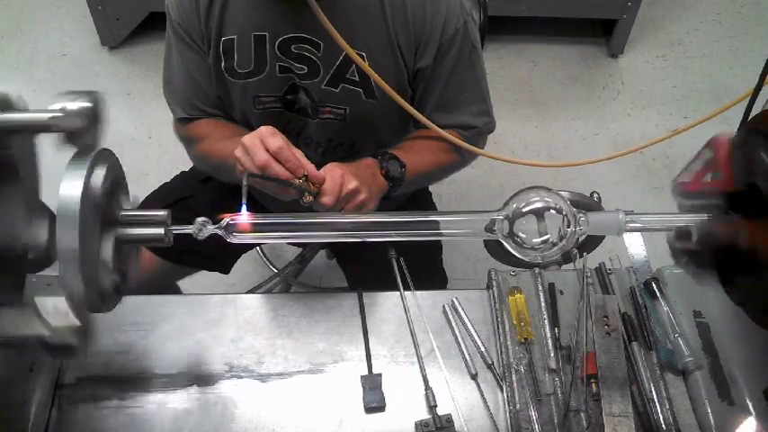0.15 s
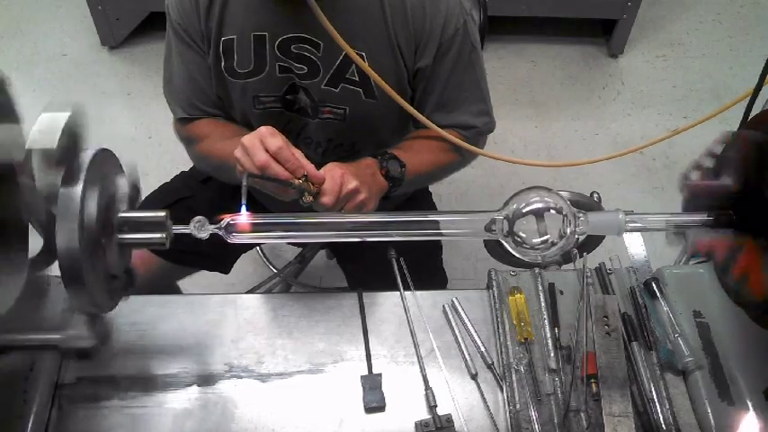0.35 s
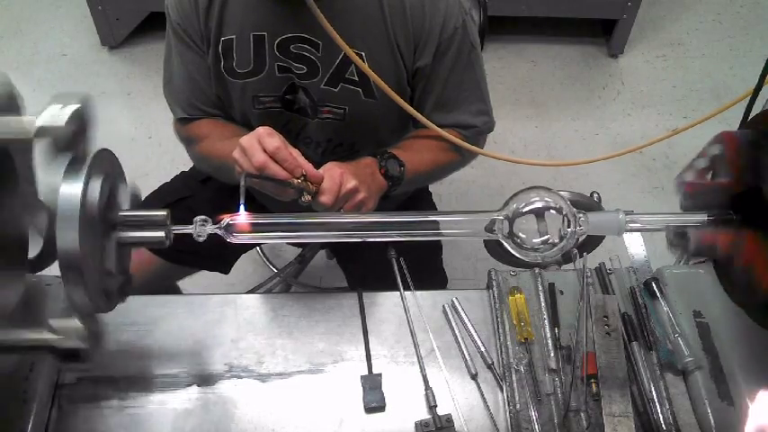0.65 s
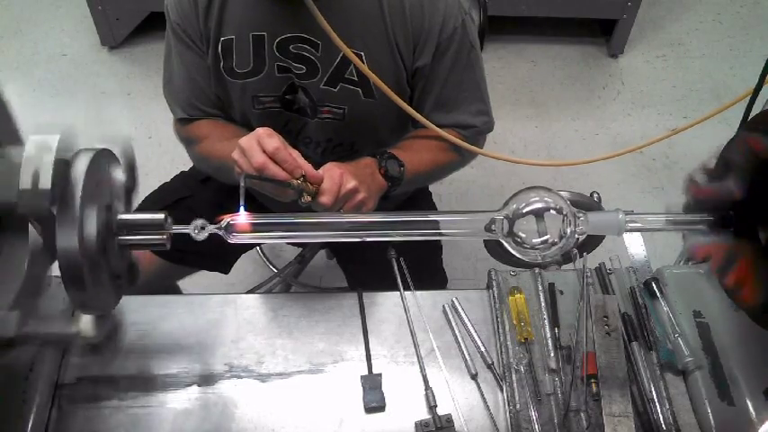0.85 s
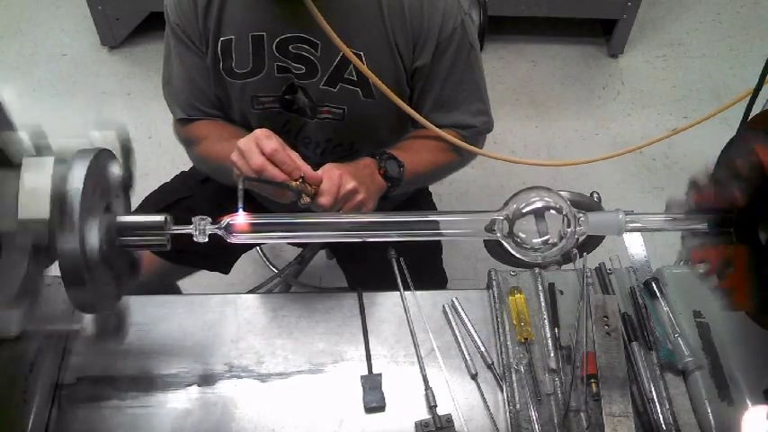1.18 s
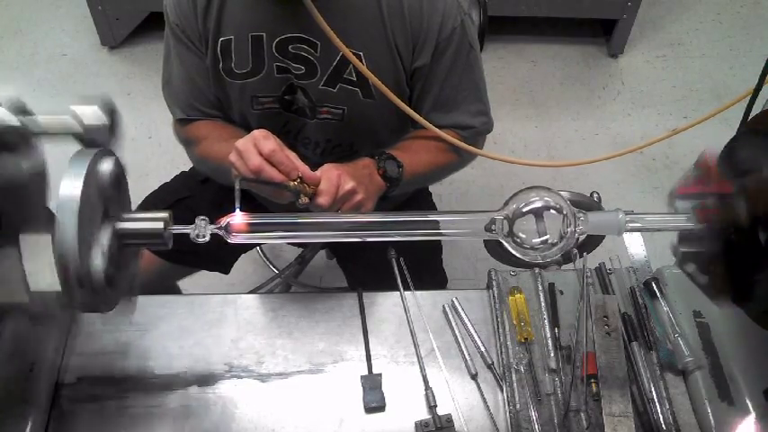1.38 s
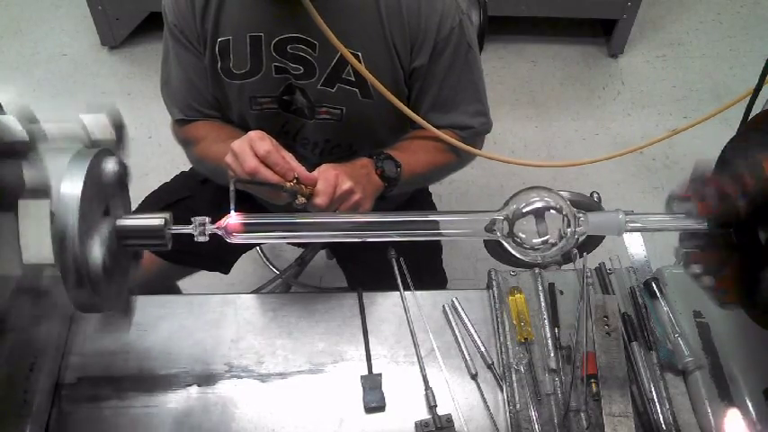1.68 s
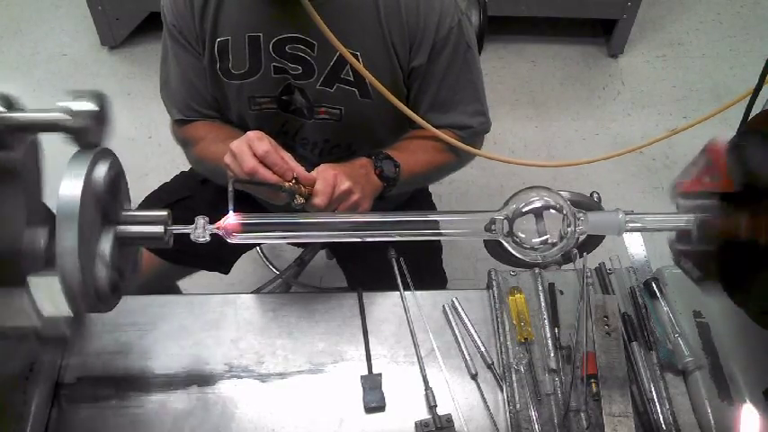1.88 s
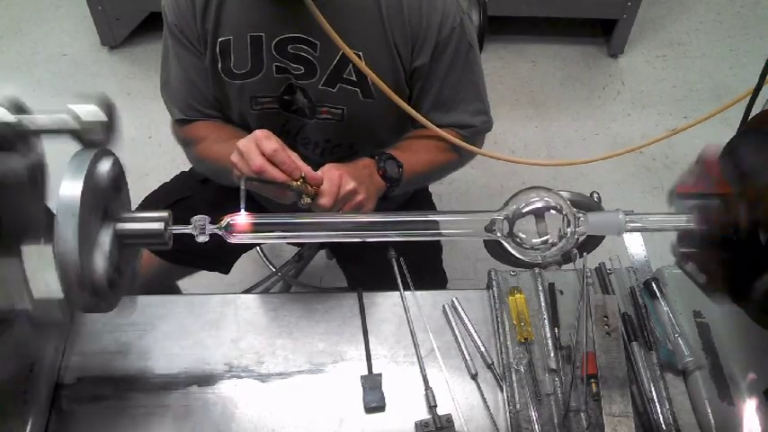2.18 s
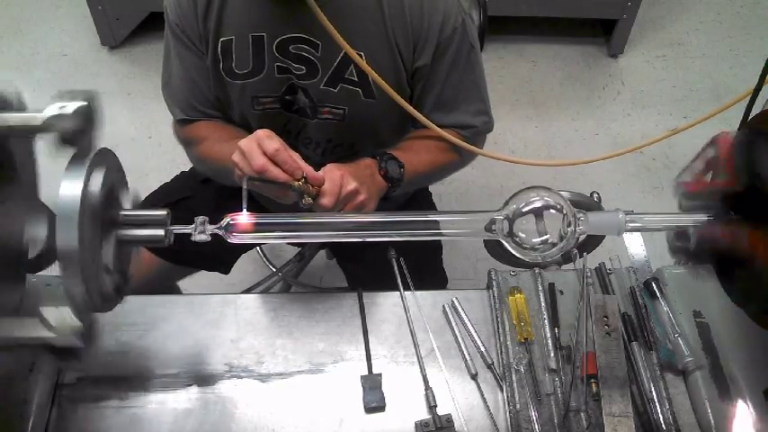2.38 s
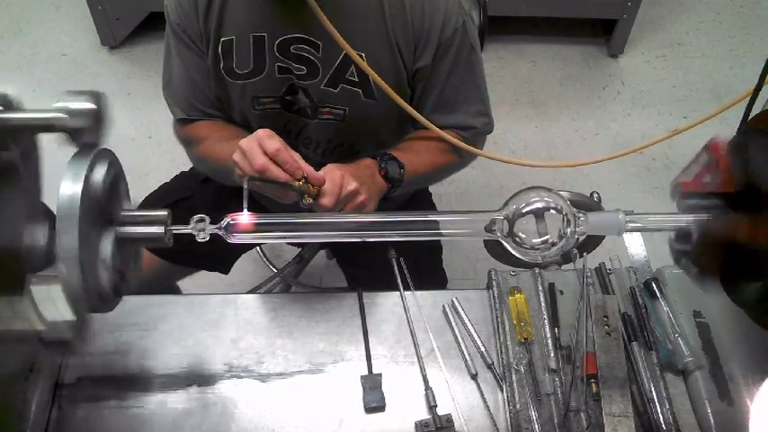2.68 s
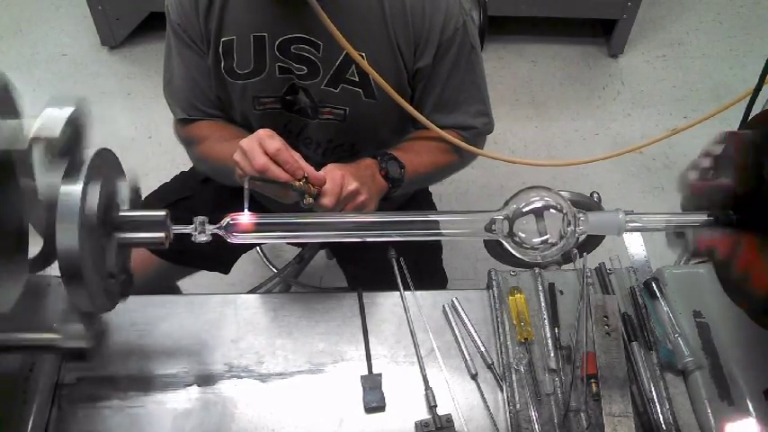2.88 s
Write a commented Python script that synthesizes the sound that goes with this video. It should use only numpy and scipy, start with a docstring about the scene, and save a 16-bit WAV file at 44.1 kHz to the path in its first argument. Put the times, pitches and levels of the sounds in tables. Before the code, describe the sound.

A small hand torch hisses steadily from 0 to about 3 seconds, bright, airy and wide in stereo, with fine rapid flicker, faint ringing bands and a breathy gas-jet top. It lifts very slightly near 1.9 seconds, and the jet again near 2.5. Beneath, a lathe drive rumbles continuously while two thin gear tones waver, stronger on the right. Close workshop pickup, very short bench echoes, dulled extreme top.

```python
"""Torch on a turning glass tube

In a workshop, a small hand torch hisses on a glass tube turning in a lathe, close to a microphone with
two ports. The flame is coloured noise that reaches the ports with a lag, so left and right swing in and
out of step as frequency rises. The gas jet adds a breathy top band from the other side. The lathe drive
rumbles in three noise bands and its gears hum in two unsteady tones; short bench echoes tint the torch.
"""
import sys
import numpy as np
from scipy import signal
from scipy.fft import rfft, irfft, next_fast_len
from scipy.io import wavfile
from scipy.ndimage import uniform_filter1d, map_coordinates

SR = 44100
rng = np.random.default_rng(int(sys.argv[2]) if len(sys.argv) > 2 else 0)


def materialize(psi):
    """Save the field psi as 16-bit PCM at rate SR to the path in sys.argv[1].

    A 1-D psi becomes a single channel; in a 2-D psi each row is a channel.
    """
    bounded = np.clip(np.atleast_2d(psi).T, -1, 1)
    quanta = np.round(bounded * 32767).astype(np.int16)
    wavfile.write(sys.argv[1], SR, quanta)


N = 134505


def amp(db):
    """Amplitude factor for a level in dB."""
    return 10 ** (np.asarray(db) / 20)


def unit(x):
    """x scaled to rms 1."""
    return x / np.sqrt(np.mean(x ** 2) + 1e-20)


def along(points, hz):
    """Level in dB at hz, from (pitch_hz, level_db) points on a log frequency axis."""
    point_hz, level_db = np.transpose(points)
    return np.interp(np.log(hz + 1), np.log(point_hz + 1), level_db)


def curve(rows):
    """One value per sample, in straight lines between (time_s, value) rows."""
    time_s, value = np.transpose(rows)
    return np.interp(np.arange(N) / SR, time_s, value)


def wobble(rate):
    """A smooth random curve with rate knots a second."""
    knots = rng.standard_normal(int(N * rate / SR) + 4)
    return map_coordinates(knots, [np.arange(N) * rate / SR])


def filtered(x, response):
    """x filtered by a complex response of frequency, padded so that the end does not wrap round."""
    size = next_fast_len(N + SR // 2)
    spectrum = rfft(x, size) * response(np.fft.rfftfreq(size, 1 / SR))
    return irfft(spectrum, size)[..., :N]


def rings(hz, bands):
    """Narrow resonant bumps or dips in dB, from (pitch_hz, width_hz, level_db) rows."""
    return sum(db / (1 + (2 * (hz - centre) / width) ** 2) for centre, width, db in bands)


def below(hz, edge):
    """Steep low-pass in dB, 3 dB down at the edge."""
    return -10 * np.log10(1 + (hz / edge) ** 12)


def above(hz, edge):
    """Steep high-pass in dB, about 3 dB down at the edge."""
    return -10 * np.log10(1 + (edge / (hz + 1)) ** 12)


def rush(colour_db, ports, patchy_db):
    """Patchy noise of rms 1 at two ports: two independent noises mixed by phase, likeness and lean."""
    grid = signal.stft(rng.standard_normal((2, N)), nperseg=512)[2]
    # patches smoothed over 6 frequency bins and 8 time frames, shared by both noises
    patches = uniform_filter1d(rng.standard_normal(grid.shape[1:]), size=6, axis=0)
    patches = uniform_filter1d(patches, size=8, axis=1)
    pair = signal.istft(grid * amp(patchy_db * unit(patches)), nperseg=512)[1][:, :N]
    port_hz, turns, alike, lean_db = np.transpose(ports)

    def heard(hz, side):
        # the angle between the two mixes sets how alike the ports sound
        angle = np.arccos(np.clip(np.interp(hz, port_hz, alike), 0, 1)) / 2
        gain = amp(colour_db(hz) + side * np.interp(hz, port_hz, lean_db) / 2)
        phase = np.exp(side * 1j * np.pi * np.interp(hz, port_hz, turns))
        return gain * phase * [np.cos(angle), side * np.sin(angle)]

    left = filtered(pair, lambda hz: heard(hz, 1)).sum(axis=0)
    right = filtered(pair, lambda hz: heard(hz, -1)).sum(axis=0)
    return unit(np.array([left, right]))


# flame loudness before FLAME_DB is added: time_s, level_db
FLAME_LEVEL = [(0.0, -34), (0.03, -31), (1.88, -32), (1.9, -29), (2.01, -33), (2.08, -31.5), (2.44, -33),
               (2.53, -31.5), (2.74, -33.5), (2.85, -32), (2.92, -34), (3.05, -32.5)]
# relative colour of the flame's hiss per Hz: pitch_hz, level_db
FLAME_COLOUR = [(1200, -30), (1900, -7.5), (2300, -1), (2700, -3), (3200, 1), (3800, -1), (4500, -1.5),
                (5000, 3), (5700, -3), (7000, -2), (8300, -2), (10000, -2.5), (11300, -3), (12000, -10.5),
                (13500, -15), (13700, -31)]
# narrow bands that the hiss rings in: pitch_hz, width_hz, level_db (over the hiss)
FLAME_RINGS = [(2140, 20, 4), (3520, 50, 5), (3824, 60, 5), (4096, 25, 4), (4214, 35, 7), (4420, 110, 6.5),
               (4490, 35, 9), (4765, 50, 4), (4900, 50, 3), (5400, 120, 3), (6450, 150, 2.5),
               (7500, 120, 2.5), (8700, 180, 3.5), (10800, 200, 2.5)]
# chosen stereo width of the hiss: pitch_hz, alike (left-right likeness 0-1), lean_db (left over right)
FLAME_WIDTH = [(1200, .85, 3), (1500, .8, 0), (1950, .3, -2), (2400, .8, 0), (2620, 1, 0), (3020, 1, 0),
               (3350, .5, -.5), (3650, .75, -.5), (3880, 1, 0), (4250, 1, 0), (4600, .9, -.5),
               (5050, .45, -.5), (5250, 1, 0), (5650, 1, 0), (6250, .4, -1), (6750, .82, -1),
               (7300, .8, -1), (7600, .4, -1), (8200, .85, -1), (8700, .6, -1), (9200, .7, -1),
               (9700, .3, -1.5), (10100, .5, -1.5), (10800, .2, -1.5), (12500, 0, -1.5)]
FLAME_DB = 4.5
FLAME_LAG_S, FLAME_START_TURNS = 0.000372, -0.525  # lead of the left port; phase offset between ports
FLAME_FLATTENING = 1  # 0-1: how far the left-right phase curve is flattened at each half turn


def flame():
    """Broad turbulent hiss with narrow ringing bands, a little earlier on the left; it flickers fast."""
    hz = np.arange(0, SR / 2, 20)
    lag = FLAME_START_TURNS + FLAME_LAG_S * hz
    turns = lag - FLAME_FLATTENING * np.sin(4 * np.pi * lag) / (4 * np.pi)
    width_hz, alike, lean_db = np.transpose(FLAME_WIDTH)
    ports = np.transpose([hz, turns, np.interp(hz, width_hz, alike), np.interp(hz, width_hz, lean_db)])
    flicker_db = 0.39 * wobble(17) + 0.43 * wobble(60) + 0.45 * wobble(250)
    hiss = rush(lambda hz: along(FLAME_COLOUR, hz) + rings(hz, FLAME_RINGS), ports, patchy_db=1.4)
    return amp(curve(FLAME_LEVEL) + FLAME_DB + flicker_db) * hiss


# jet loudness before JET_DB is added: time_s, level_db
JET_LEVEL = [(0.0, -31), (0.16, -36), (0.17, -32.5), (0.65, -32.5), (0.71, -31), (1.13, -32.5),
             (1.86, -33.5), (1.87, -30.5), (2.42, -32.5), (2.46, -28), (2.48, -30.5), (2.65, -31),
             (2.68, -34), (2.82, -30.5), (2.97, -33.5), (3.05, -33)]
# relative colour of the nozzle's breath per Hz: pitch_hz, level_db
JET_COLOUR = [(10500, -67), (11600, -1.5), (12400, -2), (12750, 6.5), (12950, 6), (13180, 6), (13400, 4),
              (13550, -3), (13700, -20)]
# the jet at the two ports: pitch_hz, lead_turns (of left), alike (likeness 0-1), lean_db (left over right)
JET_PORTS = [(11600, .25, .6, -3), (12400, .01, .85, -.5), (13000, -.21, .72, -.2), (13600, -.48, .6, -1)]
JET_DB = 1.6


def jet():
    """Gas rushing from the nozzle: a breathy top band of noise that flutters more than the flame."""
    flutter_db = 0.39 * wobble(22) + 1.3 * wobble(70)
    breath = rush(lambda hz: along(JET_COLOUR, hz), JET_PORTS, patchy_db=0)
    return amp(curve(JET_LEVEL) + JET_DB + flutter_db) * breath


BENCH_DB, BENCH_T60_S = -13, 0.1  # echo level against the direct sound; time to fall 60 dB


def bench(x):
    """Short decaying echoes, the same on both sides, draw a fixed fine ripple over the colour."""
    time_s = np.arange(SR // 5) / SR
    tail = rng.standard_normal(len(time_s)) * amp(-60 * time_s / BENCH_T60_S)
    tail = amp(BENCH_DB) * tail / np.linalg.norm(tail)
    echoes = signal.fftconvolve(x, tail[None], axes=1)[:, :N]
    return (x + echoes) / np.sqrt(1 + amp(2 * BENCH_DB))


# loudness of the lowest rumble: time_s, level_db
DEEP_LEVEL = [(0, -41.5), (1.3, -43), (2.3, -44.5), (3.05, -44)]
# loudness of the rumble's bass before BASS_DB is added: time_s, level_db
BASS_LEVEL = [(0, -42), (.8, -40), (1.3, -41.5), (1.5, -39.5), (1.8, -39), (2.45, -39), (2.65, -42),
              (3.05, -41)]
# loudness of the rumble's upper body before BODY_DB is added: time_s, level_db
BODY_LEVEL = [(0.0, -33.5), (0.1, -29.5), (0.11, -32), (0.23, -28), (0.25, -34.5), (0.3, -29.5),
              (0.35, -31.5), (1.84, -31), (1.95, -30), (2.03, -31.5), (2.94, -32.5), (3.05, -31.5)]
# relative colour of the drive's rumble per Hz: pitch_hz, level_db
DRIVE_COLOUR = [(30, -22), (45, -20), (62, -5), (75, -12), (92, -6), (120, -3.5), (150, -2), (190, 5),
                (210, 2), (235, 5.6), (270, -4), (310, -5.5), (345, -9), (410, 0.5), (540, -2), (680, -7.5),
                (800, -7), (900, -6), (1050, -10), (1200, -12.5), (1400, -12), (2000, -18), (2500, -84)]
# narrow bands in the rumble: the casing rings in or swallows most; the 384.5 and 479 Hz rows are faint gear
# sidebands either side of the 430 Hz hum: pitch_hz, width_hz, level_db (over the rumble)
DRIVE_RINGS = [(61.5, 6, 4), (91.5, 7, 4), (118, 8, -4), (157, 12, 5), (172, 10, -4), (190, 10, 2),
               (310, 12, -5), (323, 12, 4), (384.5, 14, 5), (407, 22, -6), (446, 10, 4), (458, 8, -5),
               (479, 14, 4), (513, 16, 3), (531, 12, -4), (705, 30, 3), (755, 14, 5), (810, 20, -4),
               (885, 30, 3), (925, 30, -4), (1140, 14, 4), (1355, 20, 5)]
# the drive at the two ports: pitch_hz, lead_turns (of left), alike (likeness 0-1), lean_db (left over right)
DRIVE_PORTS = [(30, 0.29, 0.13, 0.83), (62, -0.37, 0.93, 6.5), (92, -0.21, 0.77, 8.02),
               (120, -0.22, 0.71, 4.86), (150, -0.33, 0.59, -5.43), (190, -0.42, 0.78, -0.77),
               (235, -0.41, 0.76, -2.99), (270, -0.33, 0.61, -1.16), (310, -0.15, 0.66, -1.59),
               (410, -0.08, 0.32, -9.26), (540, 0.04, 0.26, -2.96), (680, 0.01, 0.68, -1.5),
               (900, -0.02, 0.79, -2.49), (1200, -0.01, 0.86, -0.48), (1400, -0.01, 0.91, -1.41),
               (2000, 0.27, 0.33, -2.17)]
DEEP_TOP_HZ, BASS_TOP_HZ = 125, 320  # where the three bands meet
BASS_DB, BODY_DB = 7.5, 2.5


def drive():
    """Lathe drive rumble: noise through the casing's resonances and faint gear sidebands, in three bands that
    swell on their own."""
    def colour(hz):
        return along(DRIVE_COLOUR, hz) + rings(hz, DRIVE_RINGS)

    def bass_colour(hz):
        return colour(hz) + above(hz, DEEP_TOP_HZ) + below(hz, BASS_TOP_HZ)

    deep = rush(lambda hz: colour(hz) + below(hz, DEEP_TOP_HZ), DRIVE_PORTS, patchy_db=-0.2)
    bass = rush(bass_colour, DRIVE_PORTS, patchy_db=0.3)
    body = rush(lambda hz: colour(hz) + above(hz, BASS_TOP_HZ), DRIVE_PORTS, patchy_db=0.69)
    deep = amp(curve(DEEP_LEVEL)) * deep
    bass = amp(curve(BASS_LEVEL) + BASS_DB) * bass
    body = amp(curve(BODY_LEVEL) + BODY_DB) * body
    return deep + bass + body


# centre of the lower and upper gear tone: pitch_hz
GEAR_HZ = [430.3, 859.5]
# loudness of the lower gear tone before its GEAR_TONES level is added: time_s, level_db
LOWER_LEVEL = [(0.0, -43), (0.14, -33), (0.16, -39), (0.76, -35.5), (0.78, -46), (0.9, -30), (0.94, -36),
               (1.23, -34), (1.31, -48), (1.39, -30), (1.47, -42), (1.52, -32), (1.55, -40), (1.61, -34),
               (1.82, -42), (1.89, -33), (2.11, -46), (2.12, -35.5), (3.03, -39), (3.05, -45)]
# loudness of the upper gear tone before its GEAR_TONES level is added: time_s, level_db
UPPER_LEVEL = [(0.0, -43), (0.08, -42), (0.26, -44), (0.3, -38), (0.46, -43.5), (1.89, -41.5), (1.92, -33),
               (2.08, -52), (2.17, -42.5), (2.32, -47), (2.51, -39.5), (2.54, -56), (2.58, -44),
               (2.93, -46), (2.96, -34), (3.05, -50)]
# one row a tone: level_db (added), wander_hz (of pitch), flutter_db (of level), lean_db (left over right)
GEAR_TONES = [(6, 1.5, 2.5, -10), (3, 1.94, 1, -1.5)]


def gears():
    """Gear hum: two sines that wander in pitch and flutter in level, both stronger on the right."""
    hum = np.zeros((2, N))
    for pitch_hz, level, tone in zip(GEAR_HZ, (LOWER_LEVEL, UPPER_LEVEL), GEAR_TONES):
        added_db, wander_hz, flutter_db, lean_db = tone
        level_db = curve(level) + added_db + flutter_db * wobble(20)
        phase = 2 * np.pi * np.cumsum(pitch_hz + wander_hz * wobble(25.15)) / SR
        hum += amp(level_db + np.array([[lean_db], [0]])) * np.sin(phase)
    return hum


def scene():
    """The torch with its bench echoes, and the lathe without them."""
    return bench(flame() + jet()) + drive() + gears()


TOP_HZ = 13690


def record(dry):
    """The microphone channel passes nothing at or above its band limit."""
    return filtered(dry, lambda hz: hz < TOP_HZ)


dry = scene()
out = record(dry)
materialize(out)
```